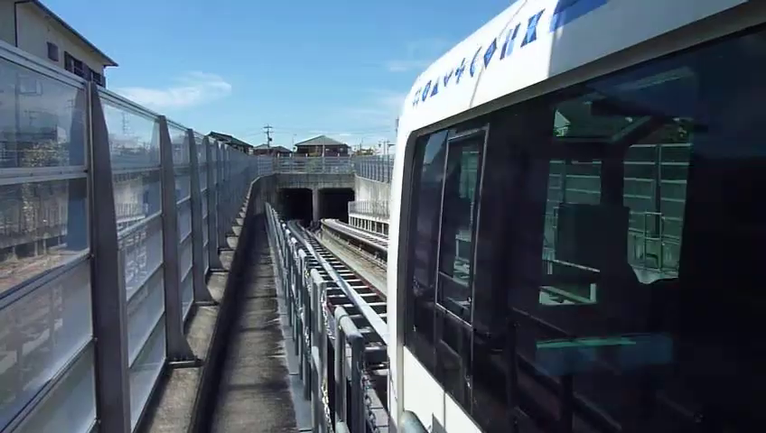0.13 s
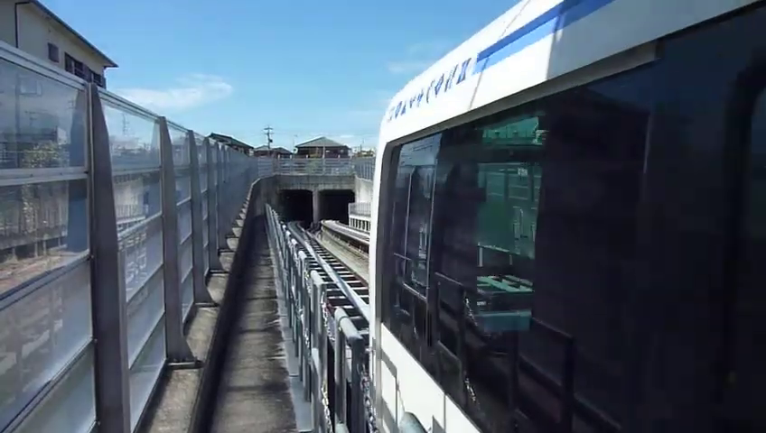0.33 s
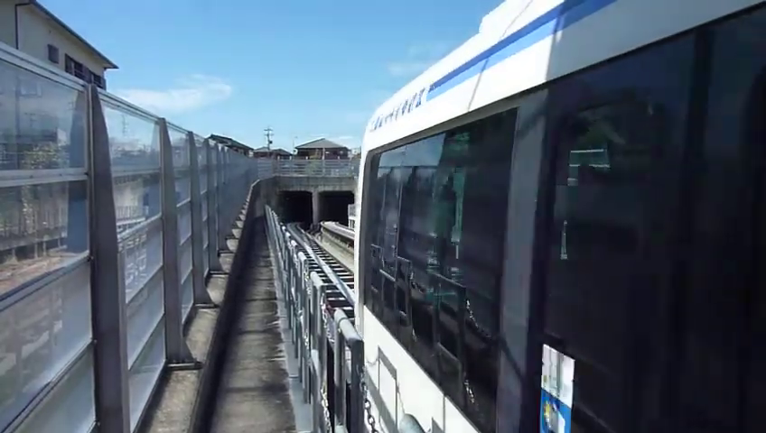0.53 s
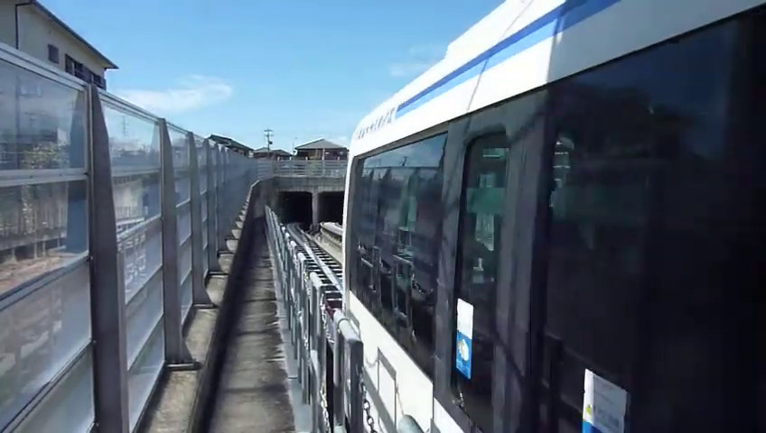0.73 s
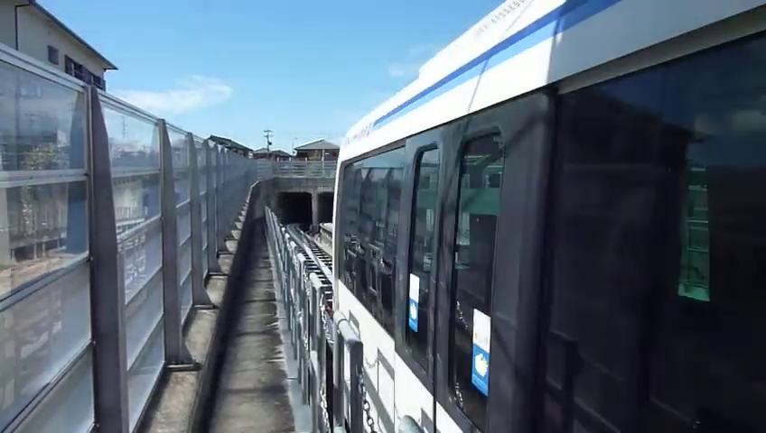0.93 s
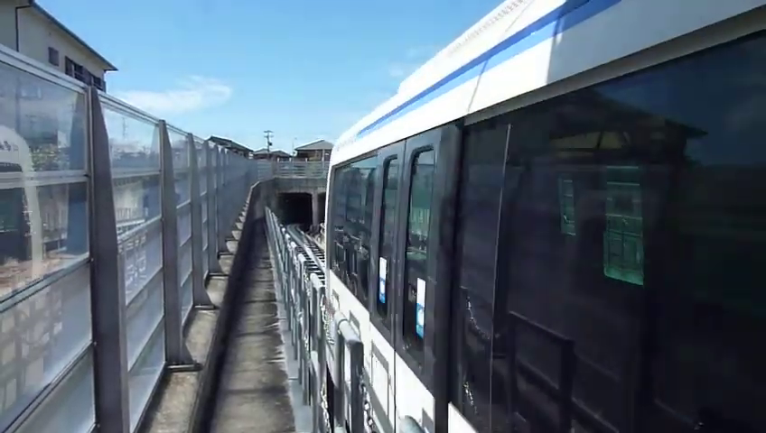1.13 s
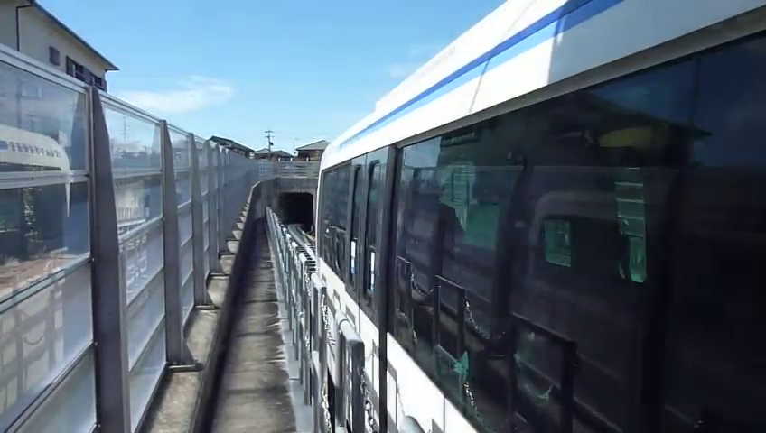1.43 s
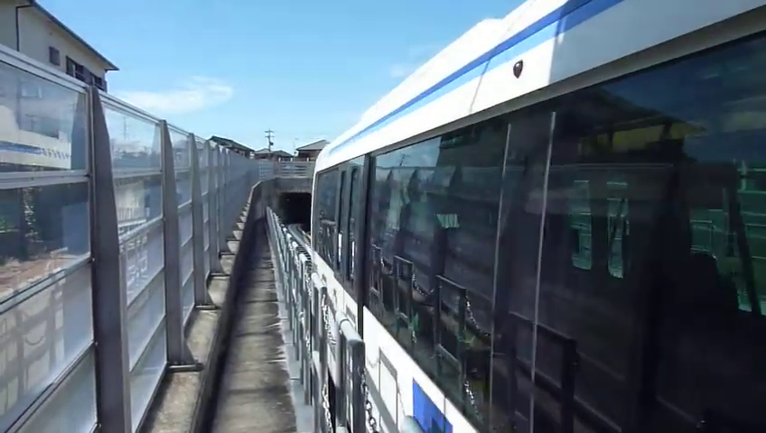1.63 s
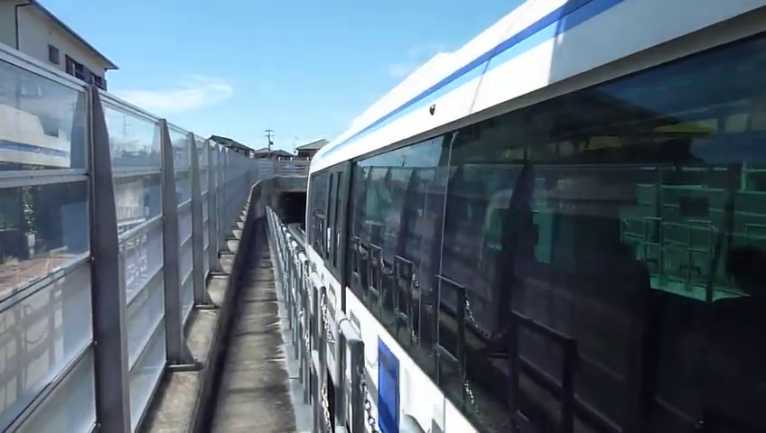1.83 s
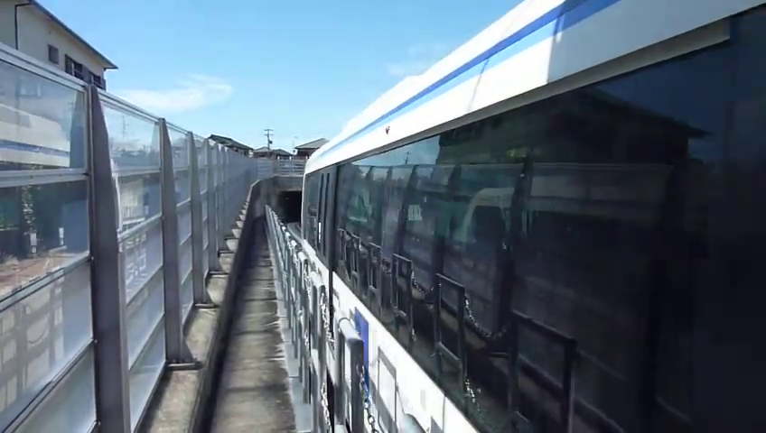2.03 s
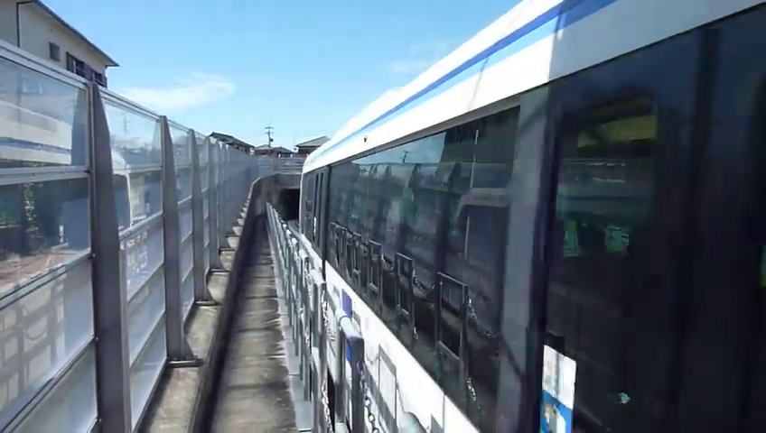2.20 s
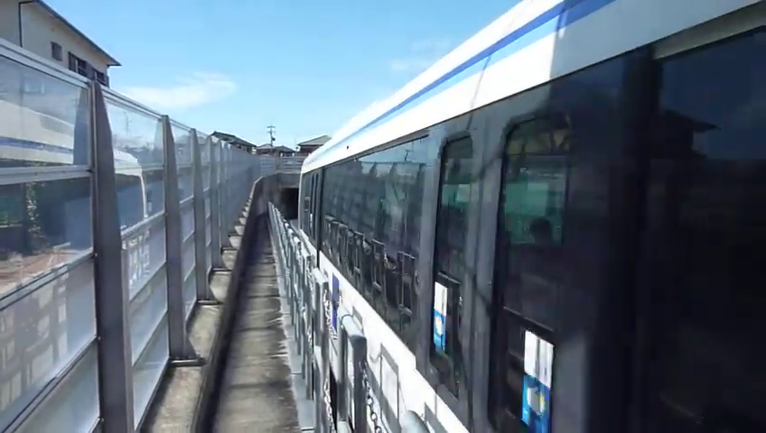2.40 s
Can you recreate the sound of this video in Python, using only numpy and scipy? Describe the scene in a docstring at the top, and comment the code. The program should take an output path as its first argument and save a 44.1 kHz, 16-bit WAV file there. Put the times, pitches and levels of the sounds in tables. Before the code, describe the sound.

A train glides past close by with a steady air rush and a high whine.

```python
"""A rush of air and a high whine cut in together: a maglev train gliding past on an elevated guideway,
gathering speed, a few metres from a microphone with two closely spaced ports. Air rushes along the cars
over a rumble and the drone of the guideway. A row of switched magnets whines, each with its own Doppler
shift, while the rail sings at the unshifted pitch. Late on, one buzzing unit under the floor sweeps by."""
import sys
import numpy as np
from scipy import signal
from scipy.fft import rfft, irfft
from scipy.io import wavfile
from scipy.ndimage import map_coordinates

SR = 44100
rng = np.random.default_rng(int(sys.argv[2]) if len(sys.argv) > 2 else 0)


def put_to_file(sound):
    """Save the sound as 16-bit audio at rate SR, in the file named by the first command-line argument."""
    columns = np.atleast_2d(sound).T  # one column per channel
    safe = np.clip(columns, -1, 1)
    whole_steps = np.round(safe * 32767)
    wavfile.write(sys.argv[1], SR, whole_steps.astype(np.int16))


N = 112896
TIME = np.arange(N) / SR
BIN_HZ = np.arange(N // 2 + 1) * SR / N
SOUND_M_PER_S = 343


def from_db(db):
    """Decibels to gain."""
    return 10 ** (np.asarray(db) / 20)


def rms_one(x):
    """Scale to unit rms."""
    return x / np.sqrt(np.mean(x ** 2) + 1e-20)


def in_time(rows):
    """A (t/s, value) curve at every sample."""
    return np.interp(TIME, *np.transpose(rows))


def colour(x, points):
    """Filter by a (f/Hz, level/dB) curve."""
    hz, db = np.transpose(points)
    gain = from_db(np.interp(np.log(np.maximum(BIN_HZ, 1)), np.log(hz), db))
    return irfft(rfft(x) * gain, N)


def drift(rate_hz):
    """Smooth random wander of about unit rms."""
    pole = np.exp(-40 * np.pi * rate_hz / SR)   # runs at a twentieth of the sample rate
    noise = rng.standard_normal(N // 20 + 4002)
    slow = signal.lfilter([1], [1, -2 * pole, pole * pole], noise)[4000:]
    return np.interp(np.arange(N) / 20, np.arange(len(slow)), rms_one(slow))


def tone(hz):
    """A sine of unit rms that follows a pitch curve."""
    return np.sqrt(2) * np.sin(2 * np.pi * (np.cumsum(hz) / SR + rng.random()))


def whistle(hz, width_hz):
    """Noise twice through one resonance: an unsteady tone of unit rms."""
    b, a = signal.iirpeak(hz, hz / width_hz, fs=SR)
    return rms_one(signal.lfilter(b, a, signal.lfilter(b, a, rng.standard_normal(N))))


def whistles(bands):
    """Several unsteady tones, each slowly swelling or fading."""
    from_midway_s = TIME - TIME.mean()
    return sum(from_db(db + slope * from_midway_s) * whistle(hz, width) for hz, width, db, slope in bands)


def stereo(direct, scattered):
    """The two ports hear the bass alike; scattered sound parts them in the treble."""
    # side against mid at the microphone: f/Hz, level/dB
    width = [(22, -22.5), (60, -24.5), (125, -38), (280, -42.5), (380, -31.5), (690, -29.5), (1000, -19.5),
             (2000, -12), (3000, -7), (4800, -5), (6200, -3.5), (8000, -1.5)]
    return direct + colour(scattered, width) * np.array([[1], [-1]])


def travelled(t, start_m_per_s=8.0, accel_m_per_s2=1.2):
    """Metres that the train has covered after t seconds."""
    return start_m_per_s * t + .5 * accel_m_per_s2 * t ** 2


def rumble():
    """A broad low resonance that comes and goes with the cars."""
    # rumble under the cars: t/s, level/dB
    swell = [(0.1, -33), (0.2, -37.5), (0.45, -31.5), (0.56, -37.5), (0.7, -33.5), (1.12, -30.5),
             (1.35, -40.5), (1.5, -29.5), (1.82, -31.5), (2.03, -36), (2.11, -30), (2.25, -30.5),
             (2.42, -34), (2.52, -30.5)]
    return from_db(in_time(swell)) * whistle(hz=276, width_hz=169)


def guideway_drones(low_hz=130, high_hz=198.1):
    """Two low resonances of the guideway swell and waver in pitch."""
    # swell of each resonance: t/s, relative level/dB
    low_swell = [(0.1, -39.5), (0.58, -28), (0.65, -47.5), (0.72, -42), (0.75, -53), (1.07, -24.5),
                 (1.1, -42.5), (1.33, -29), (1.36, -41.5), (1.76, -33), (1.77, -40), (2.18, -35),
                 (2.24, -56.5), (2.56, -27.5)]
    high_swell = [(0.1, -54.5), (0.651, -40.5), (0.8, -25.5), (0.9, -36.5), (1.15, -30), (1.3, -30.5),
                  (1.45, -30), (1.6, -38.5), (1.801, -27.5), (1.98, -29), (2.1, -36), (2.36, -34.5),
                  (2.52, -22.5), (2.56, -34)]
    low = from_db(in_time(low_swell) - 3.5) * tone(low_hz + 6 * drift(rate_hz=12))
    high = from_db(in_time(high_swell) - 4) * tone(high_hz + 8.06 * drift(rate_hz=12))
    return low + high


def rail(switching_hz=2017, wander_hz=1.5):
    """The rail stands still, so it radiates the switching tone with no Doppler shift."""
    # the rail's note: t/s, level/dB
    swell = [(0.1, -51), (0.5, -33), (0.8, -67), (1.03, -29), (1.3, -47), (1.58, -28.5), (1.75, -44.5),
             (2.1, -36), (2.3, -37.5), (2.5, -31)]
    # the rail's overtone near 4 kHz, and a separate faint, steady whistle at 8 kHz:
    # f/Hz, width/Hz, midway level/dB, slope/(dB/s)
    bands = [(4007, 77, -51, -4.5), (8000, 70, -70.5, -3)]
    high_tones = whistles(bands)
    note = from_db(in_time(swell)) * tone(switching_hz + wander_hz * drift(rate_hz=7.8))
    return note + high_tones


def buzzing_unit(hz=496.3, pass_s=2.02, closest_m=1.3, reach_m=3.5, wander_hz=1.7, flicker_db=3.5):
    """A buzz of mostly odd harmonics drops in pitch as it passes; its treble is beamed along the track."""
    # beam of the buzz before distance loss: harmonic, level/dB nearing, alongside, leaving
    harmonics = [(3, -40, -32, -37), (5, -44, -54.5, -39.5), (7, -54.5, -58.5, -52.5),
                 (9, -55.5, -64.5, -49.5), (13, -63, -72, -54), (14, -60.5, -73, -54)]
    along_m = travelled(TIME) - travelled(pass_s)
    distance_m = np.hypot(closest_m, along_m)
    bearing = along_m / distance_m   # -1 nearing, 0 alongside, 1 leaving
    doppler = 1 - np.gradient(distance_m) * SR / SOUND_M_PER_S
    pitch_hz = hz * doppler + wander_hz * drift(rate_hz=30)
    buzz = 0
    for harmonic, *beam_db in harmonics:
        level_db = np.interp(bearing, [-1, 0, 1], beam_db) + flicker_db * drift(rate_hz=19)
        buzz = buzz + from_db(level_db) * tone(harmonic * pitch_hz)
    return buzz / (1 + (distance_m / reach_m) ** 2)


def air_rush(gain_db=1.58, flutter_db=.5):
    """Air streams along the car bodies: broad, slightly fluttering noise."""
    # swell of the rush: t/s, relative level/dB
    swell = [(0.1, -29), (0.22, -29), (0.63, -29.5), (0.71, -28.2), (1.0, -28.5), (1.34, -26.5),
             (1.45, -28.5), (1.7, -27.5), (1.86, -26.5), (2.04, -29), (2.3, -28.5), (2.54, -28)]
    # its spectrum: f/Hz, relative level/dB
    spectrum = [(20, -20), (48, -19), (70, -10.5), (105, -7), (160, -4), (250, -4.5), (420, -6), (680, -5),
                (820, -9.5), (950, -8.5), (1400, -13), (1850, -18.5), (2300, -23.5), (2750, -25),
                (3500, -30), (4600, -31), (6500, -37.5), (7200, -36), (7700, -47), (8600, -60.5)]
    level = from_db(gain_db + in_time(swell) + flutter_db * drift(rate_hz=12))
    return level * rms_one(colour(rng.standard_normal(N), spectrum))


def magnets(count=11, spacing_m=3.2, closest_m=3.0, lead_m=9.0):
    """Each magnet whines sharp as it nears and flat as it leaves; together they smear into bands."""
    # switching whine of a magnet: f/Hz, width/Hz, midway level/dB, slope/(dB/s)
    bands = [(2006, 12.8, -30.5, -0.8), (2007, 80, -40, 6.5), (2976, 44, -40.5, -0.6),
             (3056, 45, -41.5, 2.7), (4028, 60, -48.5, -0.4), (4998, 190, -52, -1), (6040, 130, -55, 2.5)]
    # swell of the whine as the cars go by: t/s, relative level/dB
    swell = [(0.1, 2.5), (0.17, -1.5), (0.33, -1.5), (0.46, -0.5), (0.95, -.5), (1.05, 0), (1.4, -0.5),
             (1.55, 0), (1.7, -1.5), (1.87, 1), (2.01, -1), (2.12, 1.5), (2.22, -0.5), (2.35, 0.5),
             (2.44, -0.5)]
    whine, power = 0, 0
    for k in range(count):
        along_m = lead_m - k * spacing_m + travelled(TIME)   # positive once past the microphone
        distance_m = np.hypot(closest_m, along_m)
        emitted_s = TIME - distance_m / SOUND_M_PER_S
        whine = whine + map_coordinates(whistles(bands), [emitted_s * SR], order=3) / distance_m
        power = power + 1 / distance_m ** 2
    # near magnets dominate the blend, but distance does not set the overall level
    return from_db(in_time(swell)) * whine / np.sqrt(power)


def scene(whine_pan_db=0.65):
    """Beside the guideway: rush and drones in the middle, the whine leaning to the barrier on the left."""
    drones = guideway_drones()
    whine = stereo(magnets() + rail(), magnets() + rail())
    whine *= from_db(whine_pan_db * np.array([[1], [-1]]))
    rush = stereo(air_rush(), air_rush())
    return rumble() + drones + rush + whine + stereo(buzzing_unit(), buzzing_unit())


def record(dry, start_s=0.072, left_gain_db=-0.09, cutoff_hz=8700):
    """The sound cuts in; the microphone's left port lags a little, the treble is notched, the top cut."""
    # the train is on the right, so its treble reaches the left port late: f/Hz, lag/rad
    port_lag = [(1500, 0), (2500, 0), (5200, 0.34), (6000, 0.99), (8000, 1.1)]
    # narrow dips of the microphone: f/Hz, Q
    notches = [(5430, 14), (7900, 60), (8100, 70)]
    lag_rad = np.interp(BIN_HZ, *np.transpose(port_lag))
    left = from_db(left_gain_db) * irfft(rfft(dry[0]) * np.exp(-1j * lag_rad), N)
    ports = np.array([left, dry[1]]) * (TIME >= start_s)
    for hz, quality in notches:
        ports = signal.lfilter(*signal.iirnotch(hz, quality, fs=SR), ports)
    lowpass = signal.ellip(12, .1, 90, cutoff_hz, fs=SR, output="sos")
    return signal.sosfilt(lowpass, ports)


dry = scene()
out = record(dry)
put_to_file(out)
```